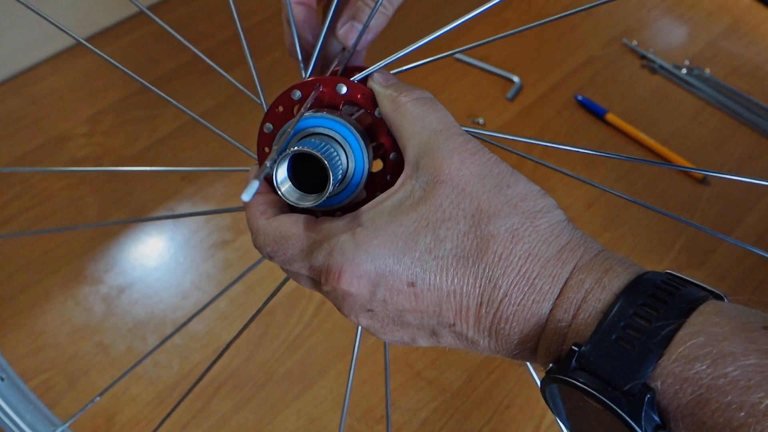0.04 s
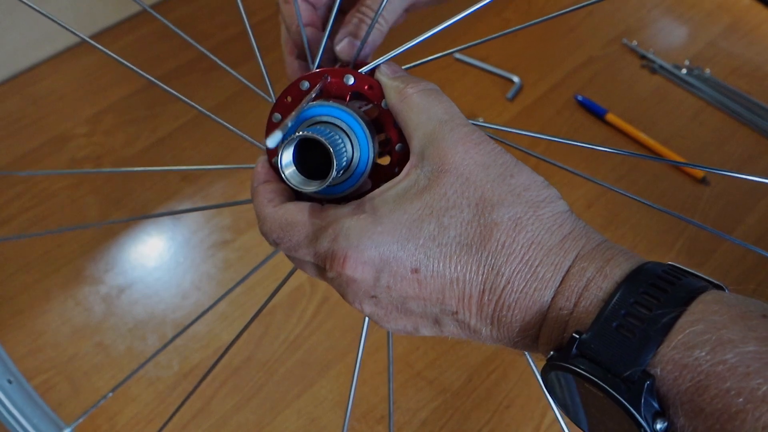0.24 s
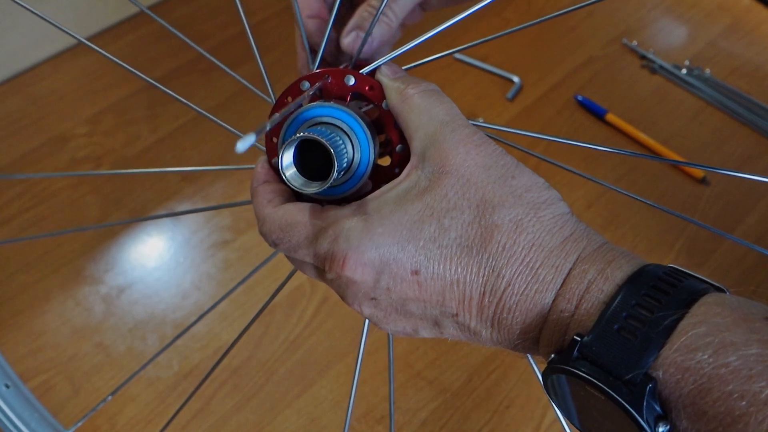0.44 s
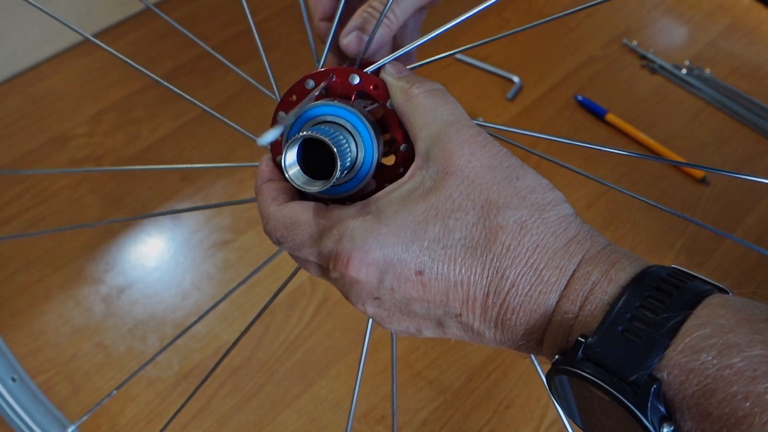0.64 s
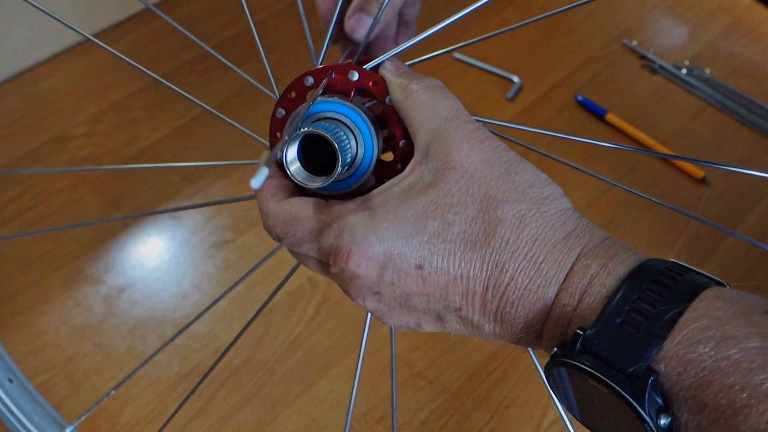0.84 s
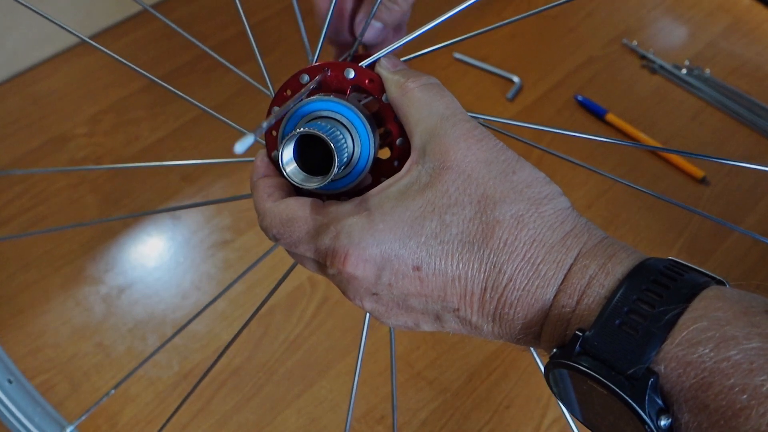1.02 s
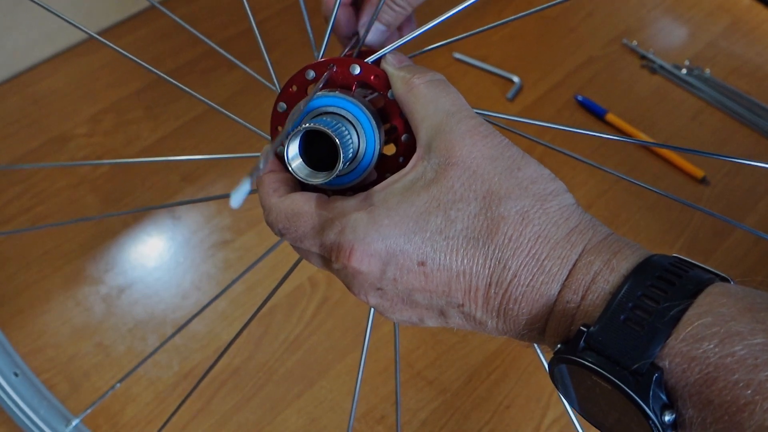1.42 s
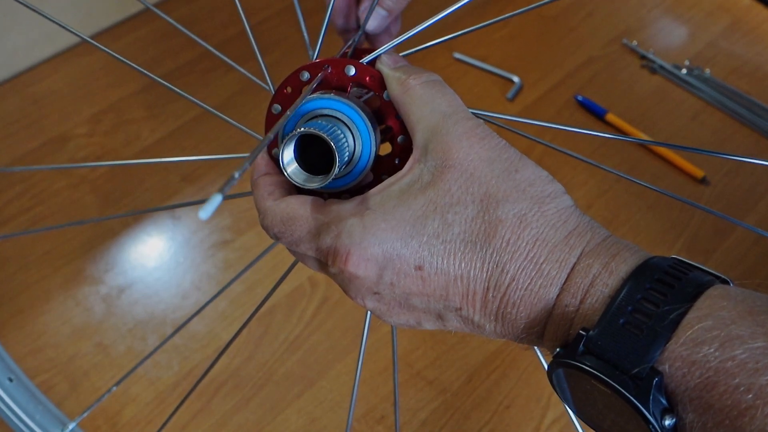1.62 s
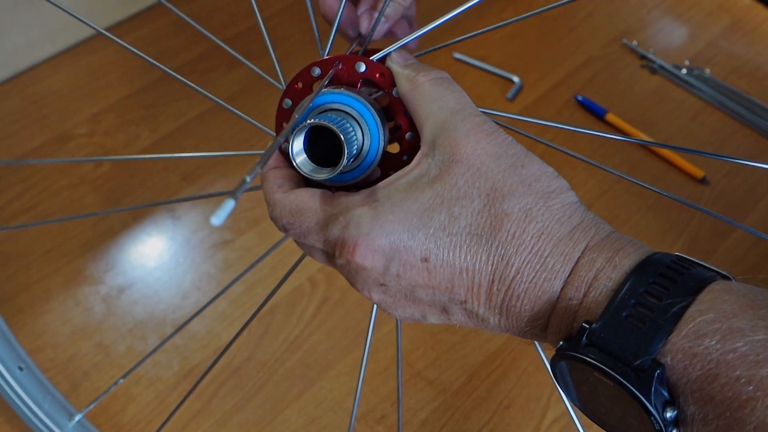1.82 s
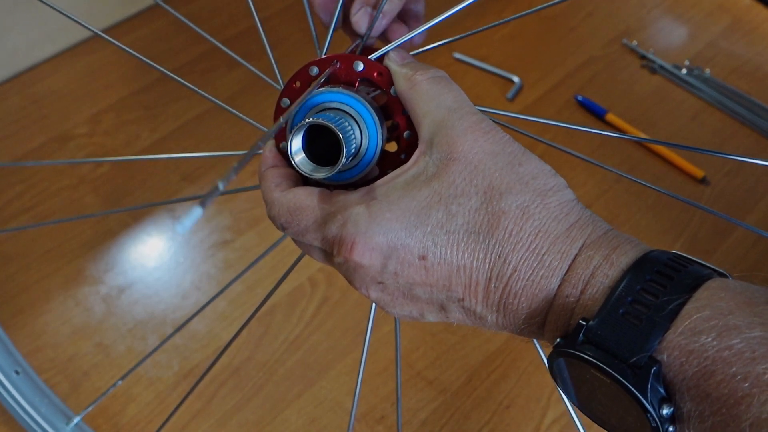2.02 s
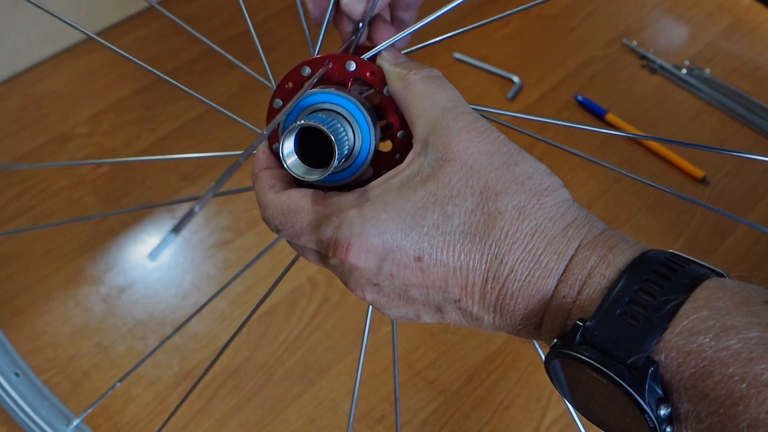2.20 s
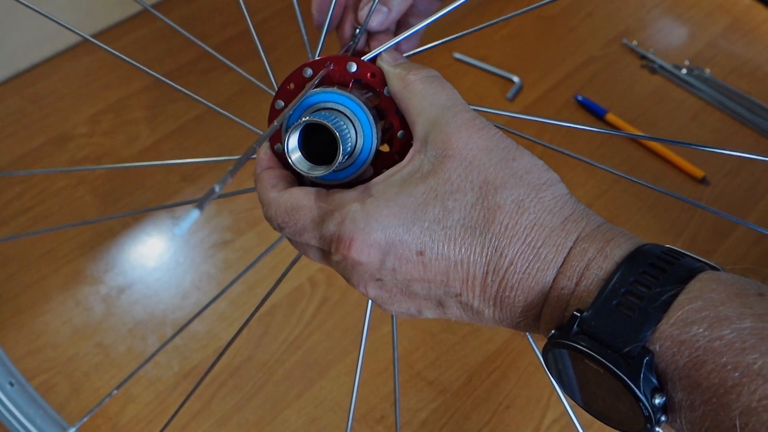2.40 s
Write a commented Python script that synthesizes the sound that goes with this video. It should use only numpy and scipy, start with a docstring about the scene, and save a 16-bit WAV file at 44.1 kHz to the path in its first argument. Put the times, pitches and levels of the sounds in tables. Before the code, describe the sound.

In a small room, a metal spoke rasps and clinks as it is threaded through a bicycle wheel's hub. A loud, squeaky shove comes first, then scattered ringing ticks, a second scrape and a soft fading slide.

```python
"""In a small room, a steel spoke is pushed through a hole in a bicycle hub held over a wooden table.
It rasps in two hard shoves and several light rubs, each a stream of tiny slips, and it squeals when
friction holds one note. It also clinks against the spokes already in the wheel. Rasps and clinks ring
the same spokes and hub; the hardest shove also shakes the wheel and the table, heard as extra bass.
The room adds a short echo, and a faint hiss lies underneath."""
import sys
import numpy as np
from scipy import signal
from scipy.fft import rfft, irfft, next_fast_len
from scipy.io import wavfile

SR = 44100
rng = np.random.default_rng(int(sys.argv[2]) if len(sys.argv) > 2 else 0)


def transcribe(u):
    """Save the signal u as a 16-bit wav file named by the first command-line argument.

    u: samples, shape (n,) or (channels, n), limited to [-1, 1]; the rate is SR.
    q: integer samples, one column per channel.
    """
    v = np.clip(np.atleast_2d(u).T, -1, 1)
    q = np.round(v * 32767).astype(np.int16)
    wavfile.write(sys.argv[1], SR, q)


N = 112454

# Spoke hitting spoke (a pan above 0 leans left):
# start_s, level_db, bass_db, treble_db, chatter_s, chatter_db, pan_db
CLINKS = [(0.121, -3, -8.5, -4.5, 0.0085, 3.5, -3), (0.137, 0.5, -24, -14, 0.0028, 3, -1),
          (0.1797, -1.5, -2, -12, 0.0069, 6.5, 0), (0.2088, 13, 4.5, -6, .008, 5.5, 1),
          (0.237, 13.5, 4, -4, 0.0052, 1.5, 1.5), (.4534, -8, 1, -1.5, 0.012, 3.5, -3),
          (0.5363, 4, -6, 2, 0.022, 6, -3), (0.7716, 3.5, -7.5, -5.5, .003, -3.5, -4.5),
          (0.929, -5.5, -15, -15, 0.0027, 1.5, -1), (1.018, -13, -8, -15, 0.0088, -8, -6),
          (1.1026, 4, -8, 3.5, 0.028, 7.5, -2), (1.293, -20, 0, -8, .006, 1, -7),
          (1.3603, -10, -15, 0, 0.0017, -2, -7), (1.6247, 1, -2.5, -4, 0.0049, 3, -6),
          (1.6762, -1, -7.5, 0, 0.019, 8.5, -2.5), (1.7067, 7.5, -9, 2, 0.0066, -0.5, -6),
          (1.905, -14.5, -2.5, 1.5, 0.002, 3, -6.5), (2.095, -0.5, -14, -0.5, 0.0022, -7, -2.5),
          (2.155, 5, -19.5, 1.5, 0.00092, -1.5, -3), (2.2251, -1, -7.5, -4.5, 0.0018, 1, -6.5),
          (2.2647, -7.5, -5, -8.5, 0.0036, 1.5, -7)]
# High notes that some clinks leave behind: start_s, pitch_hz, level_db
PINGS = [(.769, 6465, -23), (.769, 9210, -26), (0.77, 12560, -23), (1.361, 7655, -35.5),
         (1.361, 12620, -37), (1.359, 14250, -31), (1.903, 5394, -31.5), (1.905, 15385, -38),
         (2.157, 8470, -30), (2.158, 11480, -31), (2.156, 14390, -25.5)]
# How the rasp changes during each shove: time_s, level_db, bass_db, treble_db
FIRST_SHOVE = [(.203, -20.5, 18, -2), (.212, -36, 0, -5), (.232, -25.5, 21.5, -5), (.254, -13, -5.5, 0.5),
               (.28, -17, 10, -0.5), (.305, -17, 4.5, -3.5), (.325, -12, 9, -2.5), (.345, -24, 2, 1.5),
               (.365, -27.5, 13.5, -7), (.41, -50, 8, -8)]
SECOND_SHOVE = [(1.495, -45, -18, -10), (1.53, -33, -20, -2), (1.545, -43, -10, -10),
                (1.562, -18.5, -6.5, -15), (1.578, -18.5, -8, -9.5), (1.615, -37.5, 7, -3),
                (1.655, -29, -0.5, -7), (1.70, -40, -3, 5), (1.728, -31, -11, 2), (1.755, -23, -6, -5),
                (1.775, -57, 7, -6), (1.88, -42, -8, -2)]
# Light sliding touches: peak_s, rise_s, fall_s, level_db, treble_db, pan_db
RUBS = [(0, .01, 0.02, -27, -20, -8), (.065, .01, 0.012, -26.5, -15, -3.5),
        (0.14, 0.0037, 0.01, -32.5, -16, 1), (.71, 0.017, 0.054, -41, -5, -2),
        (.765, 0.017, 0.028, -28, -11, -2), (.894, .017, 0.044, -34.5, -10, -7),
        (1.09, .02, 0.016, -37, -2, -3), (1.241, .01, 0.013, -45, -8, -13), (1.474, 0.013, .03, -49, -9, 1),
        (2.08, 0.0076, 0.21, -40, 1, -3.5), (2.44, 0.065, 0.091, -43, -10, -6)]
# Notes held by friction; most sink as the spoke's free end grows:
# start_s, length_s, from_hz, to_hz, width_hz, level_db
SQUEALS = [(.0, .11, 3006, 2850, 59, -42), (0.044, .17, 2388, 1984, 680, -46),
           (0.207, 0.17, 2945, 2947, 15, -26.5), (0.24, 0.096, 2006, 2004, 4.4, -31),
           (0.263, 0.074, 2606, 2604, 18, -30), (.22, 0.16, 6514, 6514, 5.3, -37),
           (0.874, 0.05, 7260, 7080, 460, -36), (0.931, 0.077, 2680, 2610, 20, -49.5),
           (1.503, 0.037, 4270, 3940, 88, -44), (1.517, 0.0287, 3550, 3320, 82, -46),
           (1.52, 0.016, 7140, 6840, 320, -30), (1.563, 0.06, 2610, 2620, 6.3, -31.5),
           (1.56, 0.14, 1520, 1517, 64, -51), (1.12, 0.05, 2640, 2600, 21, -45),
           (1.71, .09, 2320, 2330, 69, -58), (2.478, 0.085, 2240, 2150, 170, -55.5)]
# Notes of the one spoke that sings in the last rub: pitch_hz, level_db
SINGING_NOTES = [(4780, -58.5), (5416, -48.5), (5700, -54.5), (6492, -64), (6918, -50), (7386, -56)]
# Notes of the spokes and hub (ring_s is the time to fade by 60 dB): pitch_hz, level_db, ring_s
METAL_NOTES = [(292.5, -25.5, 0.27), (384.7, -23.5, 0.32), (612.6, -33, 0.27), (712.4, -29, 0.12),
               (1027, -33, 0.19), (1508, -29, 0.24), (1834, -31, 0.16), (2004, -26, .17),
               (2604, -20.5, 0.13), (2938, -16, 0.074), (3295, -21, 0.14), (3989, -16, 0.084),
               (4162, -12.5, 0.083), (4890, -22.5, 0.43), (4910, -15, 0.1), (5200, -21, 0.26),
               (5245, -23, 0.18), (5410, -14, 0.19), (5595, -16, 0.14), (5933, -24, 0.11), (6450, -34, 0.3),
               (6490, -9, 0.13), (6900, -12.5, 0.15), (7430, -17.5, 0.12), (8180, -19.5, 0.096),
               (8510, -23.5, 0.14), (9420, -15, 0.13), (9830, -21, .2), (12300, -19, 0.16),
               (13200, -21, 0.13), (14020, -20, 0.18), (14380, -20, 0.08), (15150, -14, .15),
               (15530, -26, .15)]
# Tone of the wheel's short, noisy ring: pitch_hz, level_db
WHEEL_TONE = [(30, -71), (60, -55), (110, -28.5), (220, -17), (370, -6.5), (500, -16), (700, -15.5),
              (1200, -15), (1700, -14.5), (2400, -22.5), (2950, -3), (3350, -4), (3720, -21.5),
              (4100, -2.5), (5000, 3), (5950, -0.5), (6500, 1.5), (7500, -0.5), (8350, -4.5), (8750, -8.5),
              (9350, -7), (10250, -6), (11300, -5), (11950, -10), (12400, -2.5), (13200, -4), (13600, -9),
              (14200, -5.5), (15600, -2.5)]
# How long that noisy ring lasts: pitch_hz, ring_s
WHEEL_FADE = [(200, 0.19), (1500, 0.06), (5000, 0.065), (15000, 0.09)]
# How long the room's echo lasts: pitch_hz, ring_s
ROOM_FADE = [(150, 1), (600, 0.23), (2000, 0.44), (5000, 0.39), (15000, 0.21)]
# How alike left and right are (1 means the same): pitch_hz, likeness
LIKENESS = [(100, 0.83), (400, 0.93), (2000, 0.37), (4500, 0.31), (8000, 0.2), (15000, 0.12)]
# How much louder the left side is than the right: pitch_hz, pan_db
BALANCE = [(100, 4), (380, 3.5), (700, 7), (1300, 5.5), (2400, -1.5), (4400, -1.5), (8000, -1.5),
           (15000, 2.5)]
# Tone of the background hiss: pitch_hz, level_db
HISS_TONE = [(25, -7), (60, -18), (110, -17), (180, -3.5), (300, -5), (520, -6.5), (850, 1.5), (1300, -7.5),
             (2400, -10.5), (5000, -10), (9000, -6), (15000, -5.5)]

SLIPS_PER_S, SLIP_SPREAD_DB = 2500, 5
CHATTER_RISE_S, PING_RING_S = 0.00094, 0.073
SING_START_S, SING_LENGTH_S, SING_WIDTH_HZ, SING_PAN_DB = 2.362, 0.15, 23, -7.5
NOTES_DB, NOTE_SPREAD_DB = -7.5, 2
BASS_HZ, TREBLE_HZ, TOP_HZ = 2270, 7870, 15830


def shove(push, pan_db, size=20000, edges=2):
    """The spoke rasps on both edges of its hole as the push changes."""
    times, *columns = np.transpose(push)
    t = times[0] + np.arange(size) / SR
    db, bass_db, treble_db = (np.interp(t, times, column) for column in columns)
    loudness = amp(db) * (t < times[-1])
    out = np.zeros((2, N))
    for _ in range(edges):
        force = loudness * bass_and_treble(friction(size), bass_db, treble_db)
        add(out, times[0], pan(pan_db) * wheel_ring(force))
    return out / np.sqrt(edges)


def clinks(size=8192, lead=64):
    """Each clink is one sharp hit and a short chatter; some leave a bright ping."""
    out, t = np.zeros((2, N)), np.arange(size) / SR
    for start, db, bass_db, treble_db, chatter_s, chatter_db, pan_db in CLINKS:
        chatter = friction(size) * np.exp(-t / chatter_s) * (1 - np.exp(-t / CHATTER_RISE_S))
        hit = (t == 0) + amp(chatter_db) * chatter / (np.linalg.norm(chatter) + 1e-9)
        # The filter smears the hit both ways, so leave a few samples in front of it.
        force = bass_and_treble(np.roll(hit, lead), bass_db, treble_db)
        add(out, start - lead / SR, pan(pan_db) * amp(db) * wheel_ring(force))
    for start, hz, db in PINGS:
        ping = np.sin(2 * np.pi * hz * t + rng.uniform(0, np.pi, (2, 1)))
        add(out, start, pan(-2.5) * amp(db - 60 * t / PING_RING_S) * ping)
    return out


def rubs(bass_db=-4, size=16384):
    """The spoke slides lightly, so the rasp swells and fades."""
    out = np.zeros((2, N))
    for peak, rise, fall, db, treble_db, pan_db in RUBS:
        start = max(peak - 2 * rise, 0)
        t = start - peak + np.arange(size) / SR
        swell = np.exp(-(t / np.where(t < 0, rise, fall)) ** 2)
        force = amp(db) * swell * bass_and_treble(friction(size), bass_db, treble_db)
        add(out, start, pan(pan_db) * wheel_ring(force))
    return out


def squeals():
    """Friction locks on to single notes of the sliding spoke."""
    out = np.zeros((2, N))
    for start, length, from_hz, to_hz, width_hz, db in SQUEALS:
        add(out, start, pan(-1.9) * amp(db) * rubbed_note(length, from_hz, to_hz, width_hz))
    for hz, db in SINGING_NOTES:
        note = rubbed_note(SING_LENGTH_S, hz, hz, SING_WIDTH_HZ)
        add(out, SING_START_S, pan(SING_PAN_DB) * amp(db) * note)
    return out


def rubbed_note(length_s, from_hz, to_hz, width_hz, size=16384):
    """One note swells and fades; the greater its width, the more it wavers."""
    progress = np.linspace(0, 1, min(int(length_s * SR), size))
    wander = np.cumsum(rng.standard_normal(size)[:len(progress)]) * np.sqrt(2 * np.pi * width_hz / SR)
    wander = signal.lfilter(*signal.butter(2, 400, fs=SR), wander)
    phase = 2 * np.pi * np.cumsum(from_hz + (to_hz - from_hz) * progress) / SR
    return np.sqrt(2) * np.sin(np.pi * progress) * np.sin(phase + wander)


def friction(size):
    """Sliding steel moves in many tiny slips of uneven strength."""
    strength = amp(SLIP_SPREAD_DB * np.minimum(rng.exponential(1, size), 3.5))
    direction = rng.choice([-1, 1], size)
    slipping = rng.random(size) < SLIPS_PER_S / SR
    return unit_level(strength * direction * slipping)


def wheel_ring(force, size=16384):
    """Each touch rings the body of the wheel and its own blend of spoke and hub notes."""
    body = colour(fading_noise(WHEEL_FADE, size), WHEEL_TONE)
    hz, db, ring_s = np.transpose(METAL_NOTES)
    left_phase = rng.uniform(0, 2 * np.pi, len(hz))
    right_phase = left_phase + rng.choice([-1, 1], len(hz)) * np.arccos(look_up(LIKENESS, hz))
    fade_rate = np.log(1000) / ring_s
    gain = amp(NOTES_DB + db + NOTE_SPREAD_DB * rng.standard_normal(len(hz))) * 2 * np.sqrt(fade_rate / SR)
    t = np.arange(1, size + 1) / SR
    notes = np.exp(np.outer(2j * np.pi * hz - fade_rate, t))  # one fading wave per row
    blend = gain * np.exp(1j * np.array([left_phase, right_phase]))
    return signal.fftconvolve(force[None], body + (blend @ notes).imag, axes=1)


def room(sound, build_s=0.004, echo_db=-6):
    """The walls send back an echo that builds up over a few milliseconds."""
    echo = fading_noise(ROOM_FADE)
    t = np.arange(echo.shape[1]) / SR
    echo *= 1 - np.exp(-(t / build_s) ** 2)
    return sound + amp(echo_db) * signal.fftconvolve(sound, echo, axes=1)[:, :N]


def hiss(level_db=-53.5):
    """A faint, steady noise in the background."""
    return amp(level_db) * unit_level(colour(stereo_noise(N), HISS_TONE))


def fading_noise(fade_table, size=32768):
    """A burst of noise whose lows and highs fade at their own speeds."""
    hz, t, bands = signal.stft(stereo_noise(size), SR, nperseg=128)
    ring_s = look_up(fade_table, hz)[:, None]
    tail = signal.istft(bands * amp(-60 * t / ring_s) / np.sqrt(ring_s), SR)[1]
    return tail / np.linalg.norm(tail, axis=1, keepdims=True)


def stereo_noise(size):
    """White noise for left and right, most alike in the bass."""
    left, other = rfft(rng.standard_normal((2, size)))
    likeness = look_up(LIKENESS, np.fft.rfftfreq(size, 1 / SR))
    right = likeness * left + np.sqrt(1 - likeness ** 2) * other
    return irfft(np.array([left, right]), size)


def bass_and_treble(force, bass_db, treble_db):
    """Turns the lows and highs of a force up or down."""
    hz, spectrum = np.fft.rfftfreq(len(force), 1 / SR), rfft(force)
    bass = irfft(spectrum / (1 + (hz / BASS_HZ) ** 8), len(force))
    treble = irfft(spectrum / (1 + (TREBLE_HZ / (hz + 1)) ** 14), len(force))
    return force + (amp(bass_db) - 1) * bass + (amp(treble_db) - 1) * treble


def colour(sound, tone_table):
    """Shapes a sound's tone with a filter that never rings ahead of the sound."""
    size = next_fast_len(2 * sound.shape[-1])
    log_gain = np.log(amp(look_up(tone_table, abs(np.fft.fftfreq(size, 1 / SR)))))
    response = np.exp(signal.hilbert(log_gain).conj())
    return np.fft.ifft(np.fft.fft(sound, size) * response).real[..., :sound.shape[-1]]


def look_up(table, hz):
    """Reads between a table's rows, with octaves evenly spaced."""
    pitches, values = np.transpose(table)
    return np.interp(np.log(hz + 1), np.log(pitches + 1), values)


def add(mix, start_s, sound):
    """Mixes a sound in at its start time."""
    part = mix[..., max(round(start_s * SR), 0):][..., :sound.shape[-1]]
    part += sound[..., :part.shape[-1]]


def pan(db):
    """Left and right gains; above 0 leans left."""
    return amp(np.array([[db], [-db]]) / 2)


def amp(db):
    """Turns decibels into a gain."""
    return 10 ** (np.asarray(db) / 20)


def unit_level(sound):
    """Scales a sound to an average (rms) level of 1."""
    return sound / np.sqrt(np.mean(sound ** 2) + 1e-20)


def scene():
    """All the touches on the wheel, heard in the room over the hiss."""
    touches = clinks() + shove(FIRST_SHOVE, pan_db=-1.5) + shove(SECOND_SHOVE, pan_db=-4.5)
    left, right = room(touches + rubs() + squeals())
    left = colour(left, [(hz, db / 2) for hz, db in BALANCE])
    right = colour(right, [(hz, -db / 2) for hz, db in BALANCE])
    return np.array([left, right]) + hiss()


def record(dry):
    """Cuts away the very highest treble."""
    low_pass = signal.firwin(701, TOP_HZ, window=("kaiser", 9), fs=SR)
    return signal.oaconvolve(dry, low_pass[None], "same")


dry = scene()
out = record(dry)
transcribe(out)
```